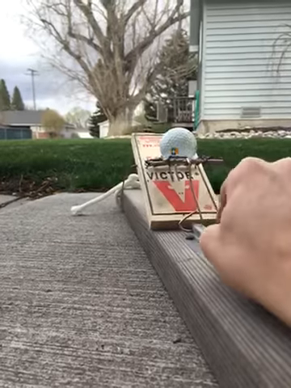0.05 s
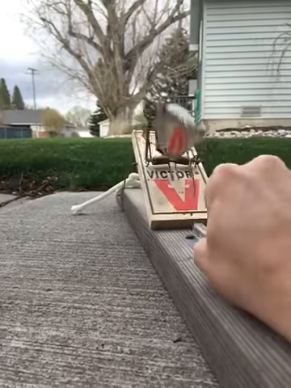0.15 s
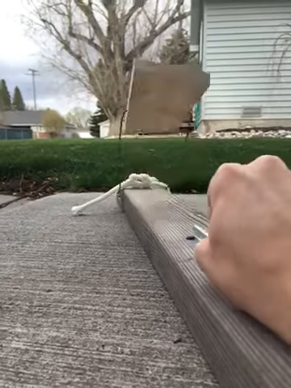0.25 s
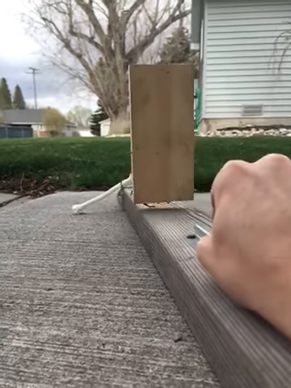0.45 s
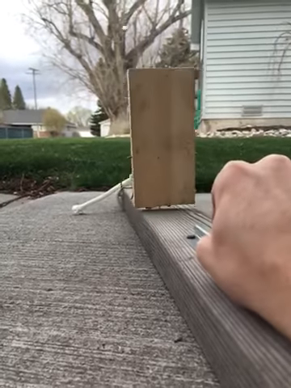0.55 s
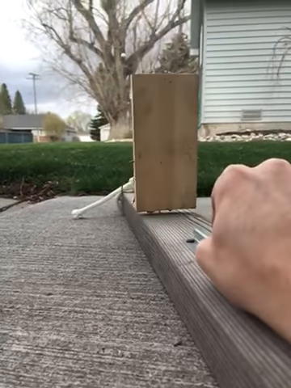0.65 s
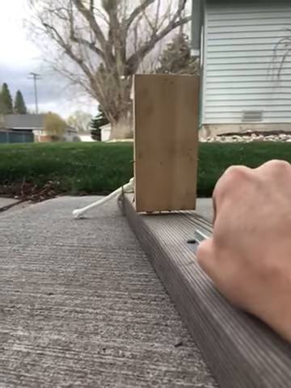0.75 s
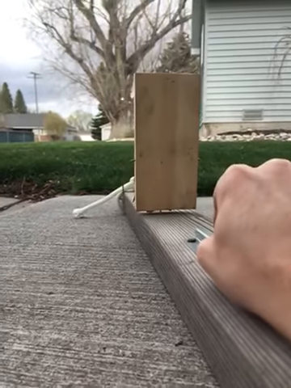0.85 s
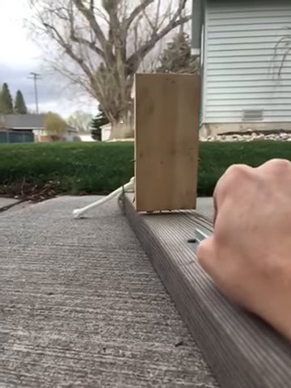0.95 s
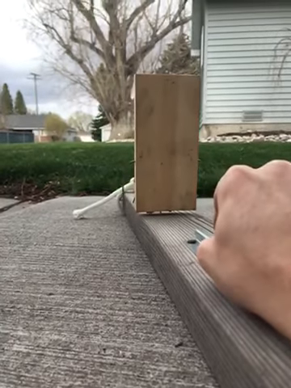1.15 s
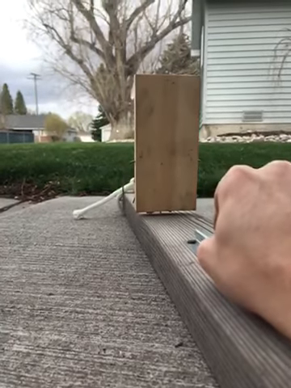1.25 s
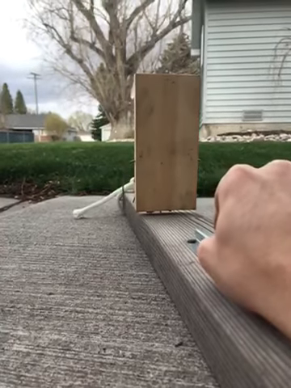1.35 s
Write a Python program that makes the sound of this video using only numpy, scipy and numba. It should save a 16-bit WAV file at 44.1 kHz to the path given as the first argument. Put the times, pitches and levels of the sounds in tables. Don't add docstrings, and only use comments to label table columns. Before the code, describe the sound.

A spring rat trap goes off with a sharp triple clap of wire on wood, then lands on a wooden beam with a short scrape and fading knocks; close phone microphone outdoors, low wind buffets.

```python
import sys
import numpy as np
from scipy import signal
from scipy.fft import rfft, irfft
from scipy.io import wavfile
from scipy.ndimage import uniform_filter1d
from numba import njit

SR = 44100
rng = np.random.default_rng(int(sys.argv[2]) if len(sys.argv) > 2 else 0)


def volts_from_db(level):
    exponent = np.asarray(level, float) / 20
    return 10 ** exponent


def dump(signal):
    limited = np.clip(np.atleast_2d(signal).T, -1, 1)
    pcm = np.round(limited * 32767).astype(np.int16)
    wavfile.write(sys.argv[1], SR, pcm)


N = 61739


def unit(x):
    return x / np.sqrt(np.mean(x ** 2))


def colour(x, table):
    hz, db = np.array(table).T
    f = np.maximum(np.arange(513) * SR / 1024, 1)
    log_gain = np.log(volts_from_db(np.interp(np.log(f), np.log(hz), db, left=-50)))
    cepstrum = irfft(log_gain)
    cepstrum[1:512] *= 2
    cepstrum[513:] = 0
    response = irfft(np.exp(rfft(cepstrum)))
    return signal.fftconvolve(x, response / np.sqrt(np.sum(response ** 2)))[:N]


def ring(x, hz, t60):
    r = np.exp(-np.log(1000) / (t60 * SR))
    w = 2 * np.pi * hz / SR
    gain = np.sin(w) * np.sqrt(2 * (1 - r * r))
    return signal.lfilter([gain], [1, -2 * r * np.cos(w), r * r], x)


def walk(rate):
    hold = int(SR / rate)
    steps = np.repeat(rng.standard_normal(N // hold + 1), hold)
    smooth = uniform_filter1d(uniform_filter1d(steps, hold), hold)
    return unit(smooth[:N])


def rattle(t, hits, modes, spectrum):
    grain_db, attack_s, wood_t60_s = 3.2, .0003, .011
    grains = rng.standard_normal((2, N)) * volts_from_db(grain_db * walk(1500))
    wood, wire = np.zeros(N), np.zeros(N)
    for s, wood_db, wire_db, hold, t60 in hits:
        attack = np.clip((t - s) / attack_s, 0, 1)
        shape = attack * volts_from_db(-60 * np.maximum(t - s - hold, 0) / t60)
        wood += volts_from_db(wood_db) * shape
        wire += volts_from_db(wire_db) * shape
    board = np.zeros(N)
    for k, (hz, db) in enumerate(modes):
        sign = (-1) ** k
        board += sign * volts_from_db(db) * ring(wood * grains[0], hz, wood_t60_s)
    return .5 * board + colour(wire * grains[1], spectrum)


def snap(t):
    # (time [s], board level [dB], wire level [dB], rattle length [s], release t60 [s])
    claps = [
        (0.186, -71.5, -61.5, .005, 0.045),
        (.201, -67.5, -60, 0.007, .02),
        (0.2097, -34.5, -41, 0.0029, 0.016),
        (0.2123, -19.5, -12, 0.0052, 0.021),
        (0.2269, -14.5, -12, 0.0051, 0.028),
        (0.2401, -3.5, -5.5, 0.0066, 0.019),
        (0.2586, -22.5, -29, 0.0012, 0.029),
        (0.2663, -30, -42.5, .003, .04),
        (0.28, -36, -46, 0.0045, 0.013),
        (0.302, -49.5, -56.5, .004, 0.099),
    ]
    # (frequency [Hz], level [dB])
    board_tones = [(300, -15.5), (540, -10.5), (750, -20), (980, -11), (1260, -3.5), (1460, -9),
                   (1976, -0.5), (2300, -4.5), (2560, -5), (2830, -5.5), (3200, -10), (3600, -5),
                   (4200, -11.5), (4850, -12.5)]
    # (frequency [Hz], level [dB per Hz])
    wire_crack = [(350, -41), (600, -9.5), (1640, -5), (2040, -11), (2270, -4.5), (7310, -6.5), (8620, -5),
                  (14500, -11), (16000, -26)]
    return rattle(t, claps, board_tones, wire_crack)


def landing(t):
    # (time [s], board level [dB], wire level [dB], rattle length [s], release t60 [s])
    knocks = [(0.4216, -29.5, -31, 0.0018, 0.038), (0.425, -37.5, -42, 0.02, 0.021),
              (0.447, -31, -37.5, 0.0045, 0.01), (0.453, -41, -41.5, .011, 0.019),
              (0.468, -50, -45.5, 0.0037, 0.036), (0.483, -54.5, -65.5, 0.042, 0.53),
              (0.538, -50.5, -60.5, 0.0018, .02), (0.5409, -42.5, -62, 0.0028, 0.031),
              (0.5797, -49.5, -58.5, 0.0074, 0.047), (0.599, -68, -66.5, 0.0077, 0.018),
              (0.6579, -53.5, -74, .008, 0.11), (.684, -68, -70.5, 0.012, 0.041)]
    # (frequency [Hz], level [dB])
    end_tones = [(974, -4), (1324, -2.5), (1650, -6.5), (1970, -4), (2500, -12), (3359, -22), (4177, -14.5),
                 (4856, -50)]
    # (frequency [Hz], level [dB per Hz])
    scrape = [(600, -1.5), (1500, 11), (2600, -1), (4200, 3), (6500, 0.5), (10000, -3), (14500, -9.5),
              (16000, -4.5)]
    return rattle(t, knocks, end_tones, scrape)


def ticks(t):
    # (time [s], level [dB], pitch [Hz], t60
    # [s])
    touches = [(.062, -69, 6500, .02), (.0643, -48, 1500, .012), (.0655, -70, 4000, .004),
               (.1895, -66, 9000, .004), (.193, -66, 9000, .004), (.207, -62, 13500, .005),
               (.2135, -20, 8700, .006), (.2305, -20, 8700, .006), (.2412, -11, 2020, .02),
               (.2416, -13, 2800, .012), (.274, -40, 1250, .06), (.4211, -34, 4250, .013),
               (.440, -40, 220, .03), (.4500, -38, 480, .012), (.455, -43, 4200, .02),
               (.470, -47, 4200, .02), (.501, -68, 9000, .015), (.543, -56, 4000, .01),
               (.584, -59, 6200, .008), (.686, -71, 8800, .02)]
    out, noise = np.zeros(N), rng.standard_normal(N)
    for s, db, hz, t60 in touches:
        scratch = noise * (t > s) * np.exp(-np.maximum(t - s, 0) / .003)
        out += volts_from_db(db + 6.5) * ring(scratch, hz, t60)
    return out


def thump(t):
    start_s, hz, level_db, t60_s = .240, 66, -17, .085
    u = np.maximum(t - start_s, 0)
    attack = np.minimum(u / .006, 1)
    return volts_from_db(level_db - 60 * u / t60_s) * np.sin(2 * np.pi * hz * u) * attack


def yard(x):
    echo_db, echo_t60_s, late_db, late_t60_s = -43, 0.31, -64.5, 1.2
    # (frequency [Hz], level [dB per Hz])
    echo_colour = [(300, -17), (750, -11), (1250, -2), (2800, -1.5), (5000, -6), (9000, -9.5), (14500, -19),
                   (16000, -32.5)]
    u = np.arange(SR // 2) / SR
    fade = volts_from_db(echo_db - 60 * u / echo_t60_s) + volts_from_db(late_db - 60 * u / late_t60_s)
    build_up = np.minimum(u / 0.03, 1)
    tail = rng.standard_normal(len(u)) * fade * 0.067 * build_up
    return colour(signal.fftconvolve(x, tail)[:N], echo_colour)


@njit
def svf(x, hz, damp):
    y, band, low = np.empty(len(x)), 0., 0.
    for i in range(len(x)):
        g = np.tan(np.pi * hz[i] / SR)
        v = (band + g * (x[i] - low)) / (1 + g * (g + damp))
        band = 2 * v - band
        low = low + 2 * g * v
        y[i] = damp * v
    return y


def eddies(hz, width):
    centre = hz * volts_from_db(1.2 * walk(40))
    x = rng.standard_normal(N)
    for _ in range(4):
        x = svf(x, centre, width)
    return x / np.sqrt(uniform_filter1d(x ** 2, size=2000))


def wind(t):
    # (time [s], level [dB], small eddies against large [dB])
    gusts = [(0.0, -32.5, -28), (0.116, -47.5, -21.5), (0.202, -40, -6), (0.256, -49, 10.5),
             (0.306, -54.5, 1), (0.424, -54.5, -14), (0.478, -31.5, -8.5), (0.626, -42.5, -38),
             (0.68, -33, -51), (0.806, -39.5, -39), (0.844, -38, -38), (0.868, -44, -18),
             (0.934, -36.5, -21), (1.0, -38.5, -13.5), (1.116, -46.5, -4.5), (1.284, -45.5, -5),
             (1.32, -67, 14.5), (1.4, -33.5, -10)]
    s, db, small_db = np.array(gusts).T
    large = eddies(80, 1.5)
    small = volts_from_db(np.interp(t, s, small_db)) * eddies(230, 1.0)
    flutter_db = 3.0 * walk(30)
    return (large + small) * volts_from_db(np.interp(t, s, db) + flutter_db - 4.0)


def hum():
    # (frequency [Hz], level [dB per Hz])
    suburb = [(88, -25), (150, -10.5), (348, -15), (524, -9.5), (589, -11.5), (941, -13.5), (1790, -23.5),
              (13400, -53), (16000, -60.5)]
    low_pass = signal.butter(2, 1400, fs=SR, output="sos")
    x = colour(rng.standard_normal(N), suburb)
    bass = signal.sosfiltfilt(low_pass, x)
    treble = x - bass
    return volts_from_db(-59) * (bass * volts_from_db(0.91 * walk(6)) + treble * volts_from_db(1.3 * walk(5.5)))


def scene():
    t = np.arange(N) / SR
    trap = snap(t) + landing(t)
    return (trap + yard(trap) + ticks(t) + thump(t) + wind(t) + hum())[None]


def roll_off(x):
    return signal.sosfilt(signal.butter(12, 16570, fs=SR, output="sos"), x)


def record(dry):
    hiss_db, ceiling, top_hz = -80, .6, 15450
    x = dry + volts_from_db(hiss_db) * rng.standard_normal(dry.shape)
    x = x / (1 + np.abs(x / ceiling) ** 4) ** .25
    x = signal.sosfilt(signal.ellip(7, .5, 45, top_hz, fs=SR, output="sos"), x)
    x = x / (1 + np.abs(x / .8) ** 8) ** .125
    return roll_off(x)


dry = scene()
out = record(dry)
dump(out)
```